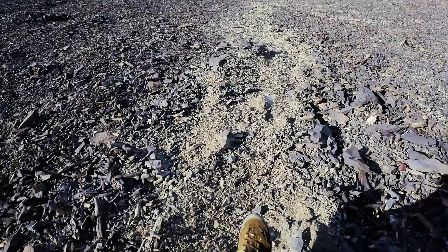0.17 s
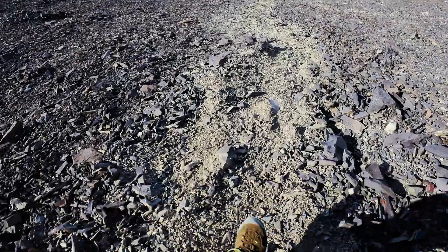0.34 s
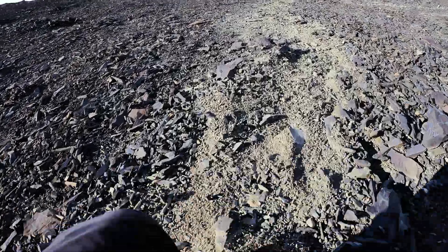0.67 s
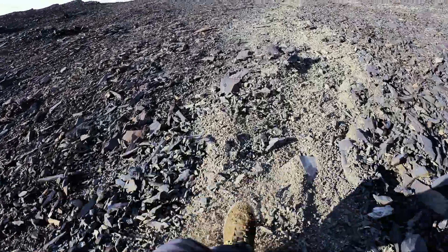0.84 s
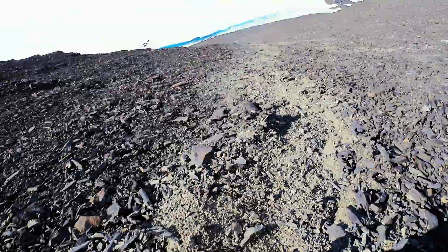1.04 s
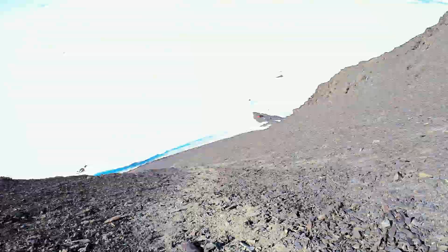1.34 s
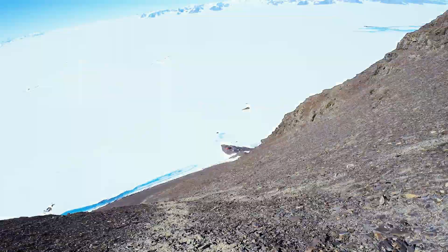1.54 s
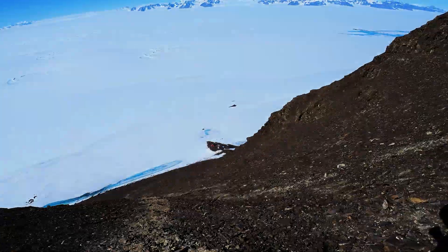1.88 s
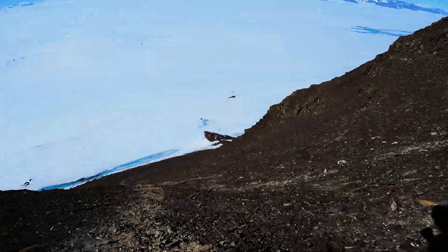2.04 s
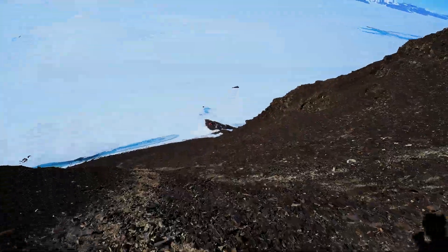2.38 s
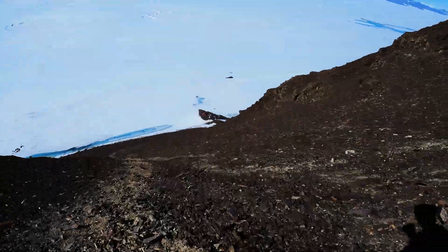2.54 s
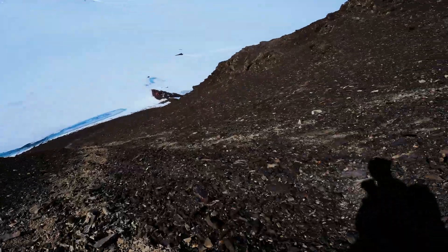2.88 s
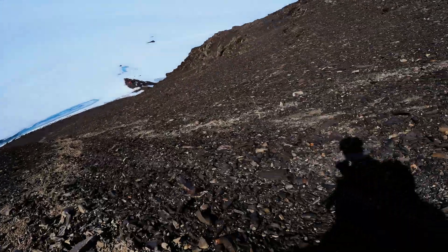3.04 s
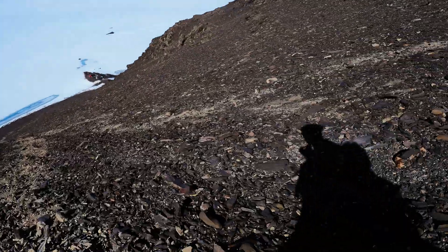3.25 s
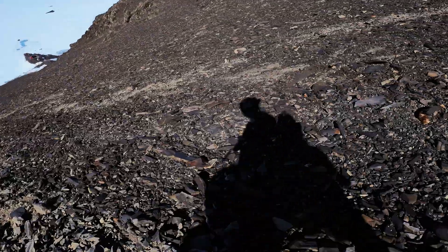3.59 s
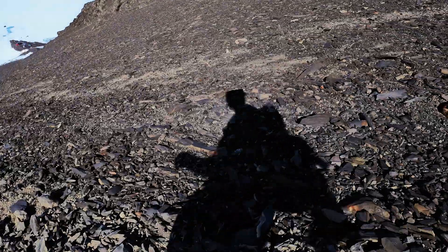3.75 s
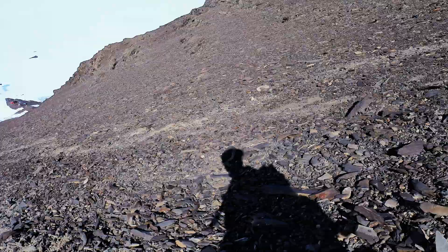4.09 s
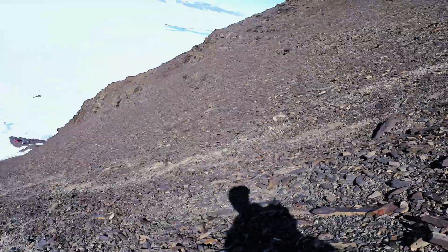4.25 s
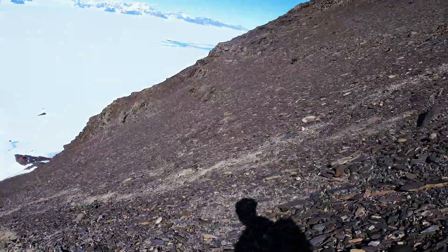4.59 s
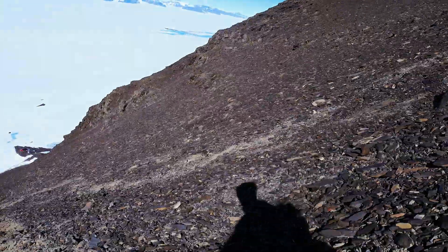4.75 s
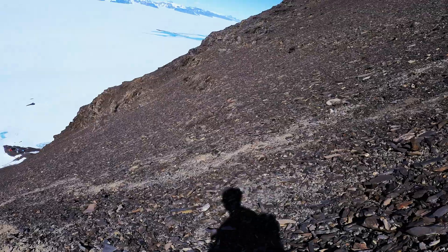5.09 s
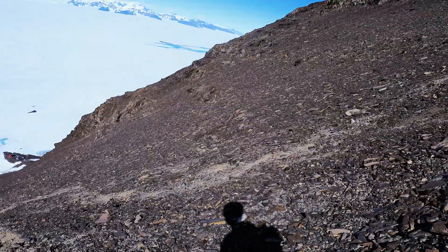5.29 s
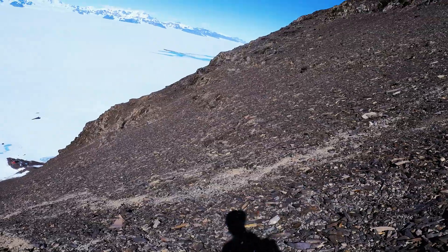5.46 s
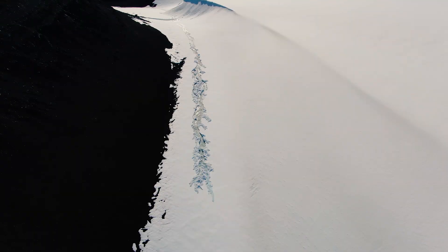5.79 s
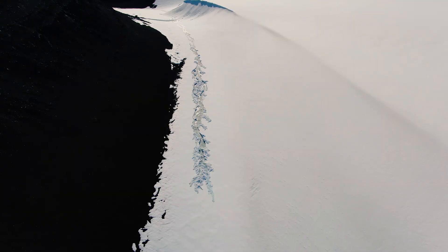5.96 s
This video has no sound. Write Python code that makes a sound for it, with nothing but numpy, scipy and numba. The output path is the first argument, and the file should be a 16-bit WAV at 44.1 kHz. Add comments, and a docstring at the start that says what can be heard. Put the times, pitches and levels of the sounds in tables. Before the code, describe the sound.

Outdoors and close, dry, without echo. From 0 to 1 s the sound is mono: bright gritty scree hisses and crunches under boots, with sharp stone knocks near 0.45, 0.75 and 0.95 s and short low puffs of wind. At about 1 s it opens into wide stereo; the grit is thinner, and wind swells from 1.4 s, leaning left near 1.8 s. Crunches and hard stone clacks bunch between 2.3 and 2.8 s, with a hissing gust at 2.5 s, then more knocks around 3.1 s. From 3 s wind swings right, rumbling and slapping in rapid soft thumps until 5.1 s, while the sliding stones thicken and grow louder. Around 5.2 s it collapses to mono: a loud, dense rush of grit, snapping chips and clinking flakes over continuing low wind, which fades just before an abrupt stop at 5.8 s with a tiny dull tail.

```python
"""A walker slides down loose scree with a small camera: filtered grain showers and noise hiss underfoot,
damped rings knock, snap and clink, and tumbling noise with short pressure pulses buffets the ports.
At first one microphone serves both ears; from about 1 s a pair opens and the wind leans from side to side;
after 5.2 s one microphone serves both again, until the sound stops at 5.8 s with a brief, dull tail."""
import sys
import numpy as np
from scipy import signal
from scipy.fft import rfft, irfft, next_fast_len
from scipy.io import wavfile
from scipy.ndimage import uniform_filter1d
from numba import njit

SR = 44100
rng = np.random.default_rng(int(sys.argv[2]) if len(sys.argv) > 2 else 0)


def log_audio(samples):
    """Write samples as a 16-bit WAV file to the path given in sys.argv[1]."""
    # one column per channel
    frames = np.atleast_2d(samples).T
    # limit to full scale, then quantise
    limited = np.clip(frames, -1, 1)
    pcm = np.round(limited * 32767).astype(np.int16)
    wavfile.write(sys.argv[1], SR, pcm)


N = 270333
TIME = np.arange(N) / SR


# Sliding scree. Each row: time in seconds, then the levels of stones, chips and grit in dB.
SLIDE = [(0.0, -35.5, -39, -27), (0.14, -41.5, -42, -29), (0.37, -39.5, -38.5, -27.5),
         (0.64, -39, -45.5, -32.5), (0.92, -42, -42, -30.5), (1.15, -43, -36.5, -31),
         (1.34, -43.5, -42, -32), (1.51, -44, -46, -34), (2.09, -42.5, -42.5, -29),
         (2.31, -40.5, -39, -28.5), (2.43, -45, -44, -31.5), (2.78, -37, -40.5, -27),
         (3.24, -36.5, -38, -27), (3.45, -36, -41.5, -26.5), (3.81, -33.5, -35.5, -22),
         (3.99, -32.5, -37, -23.5), (4.21, -29.5, -34.5, -24.5), (4.37, -32, -33, -22.5),
         (4.52, -32, -33.5, -24.5), (4.71, -33.5, -36.5, -27), (5.01, -33, -39.5, -27.5),
         (5.17, -32.5, -38, -22.5), (5.21, -27.5, -30.5, -18), (5.38, -30, -28.5, -21.5),
         (5.55, -35, -28, -21), (5.59, -35, -24.5, -25), (5.61, -41, -30, -25.5), (5.65, -36, -28.5, -25.5),
         (5.7, -32.5, -21.5, -21), (5.78, -33.5, -25, -25)]
# Boot crunches (positive) and stalls (negative). Each row: peak in seconds, length in seconds, lift in dB.
CRUNCHES = [(.05, 0.041, 4), (.19, 0.084, 8), (.48, 0.085, 5.5), (1.48, 0.2, 7.5), (1.61, 0.24, -9.5),
            (1.7, 0.048, 8), (1.82, 0.17, 2.5), (1.98, 0.11, -8), (2.3, 0.061, 8.5), (2.42, 0.081, 7),
            (2.5, 0.081, 13), (2.55, 0.032, 3), (2.775, 0.032, 6.5), (2.93, 0.13, -2), (3.07, 0.085, 9),
            (3.17, 0.055, 4), (3.63, 0.092, 3.5), (3.72, 0.078, 2.5), (4.1, 0.19, -4.5), (4.88, 0.064, 3.5)]
CRUNCH_SHARES = 0.98, 0.43, 0.38  # of the lift, for stones, chips and grit
# Grain sizes. Each row: lowest and highest pitch in Hz, grains per second, cycles to fall 30 dB,
# size spread in dB, hiss in dB above the grains, lean to the left in dB, share of the ground's turn,
# likeness of the ports (0-1).
GRAIN_SIZES = [(1242, 4470, 700, 7.9, 2.5, 5.5, -1, 0.54, 0.53),
               (4210, 7660, 1100, 11, 2, 0.5, 1.5, 0.3, 0.51),
               (8070, 15800, 2800, 3.4, 3.5, 2.5, -2, 0.58, 0.14)]
# Colour of each microphone for scree. Each row: frequency in Hz, gain in dB.
FRONT_COLOUR = [(700, 19), (1100, -25.5), (2000, -14.5), (2700, -13), (4000, -9), (5500, -8.5), (7300, -8),
                (9500, -9.5), (12200, 0.5), (14000, -7), (16000, -9)]
LEFT_COLOUR = [(700, -10), (1200, -33), (2000, -8.5), (2600, -5), (3800, -9.5), (5500, -12), (8000, -1.5),
               (9300, 6), (10800, 7), (12500, -0.5), (13300, -2), (16000, -2.5)]
RIGHT_COLOUR = [(700, 12.5), (1200, -2.5), (2000, 9), (2700, 14), (4000, -11), (5500, -48), (7000, -32.5),
                (8500, -20.5), (10500, -10.5), (12000, -1), (13500, -9.5), (16000, -6.5)]
PORT_LAG = 7  # samples by which the right port hears the shared grains late


def scree(pair):
    """Granular flow: three grain sizes share surges, and partly coherent ports each hear some of their own."""
    lift_db = bells_db(CRUNCHES)
    levels = [db + share * lift_db for db, share in zip(curves(SLIDE), CRUNCH_SHARES)]
    turn_db = ground_turn()
    surge_db = 0.5 * walk(30) + 1.6 * walk(80)
    out = 0
    for db, (lo, hi, rate, cycles, spread, hiss_db, lean_db, share, alike) in zip(levels, GRAIN_SIZES):
        both, own_left, own_right = (
            grains(lo, hi, rate, cycles, spread, clink=3.8) + amp(hiss_db) * rng.standard_normal(N)
            for _ in range(3))
        alike = np.clip(alike, 0, 1)
        left = np.sqrt(alike) * both + np.sqrt(1 - alike) * own_left
        right = np.sqrt(alike) * np.roll(both, PORT_LAG) + np.sqrt(1 - alike) * own_right
        ports = (both, FRONT_COLOUR), (left, LEFT_COLOUR), (right, RIGHT_COLOUR)
        heard = [unit(colour(x, table, lo, hi)) for x, table in ports]
        gain = amp(db + surge_db + 0.77 * walk(60))
        out = out + gain * sides(pair * (lean_db + share * turn_db), pair) * route(*heard, pair)
    return sheen(out, pair)


# The top of the grit's hiss brightens and dulls. Each row: time in seconds, lift in dB.
SHEEN = [(1.0, -0.5), (1.2, -0.5), (1.6, 0.5), (2.1, -0.5), (2.35, -1), (2.6, -3), (2.95, -2), (3.2, 3.5),
         (3.45, -4.5), (3.8, -3), (4.05, -4.5), (4.3, -1), (4.6, 1), (4.9, -3), (5.15, -1.5)]
SHEEN_HZ = 11000


def sheen(ground, pair):
    """Spectral tilt in time: the band above the corner rises and falls while the pair is on."""
    top = signal.sosfiltfilt(signal.butter(4, SHEEN_HZ, "high", fs=SR, output="sos"), ground)
    lift_db = curves(SHEEN)[0] + 1.2 * walk(11)
    return ground + (amp(pair * lift_db) - 1) * top


# Knocked stones. Each row: start in seconds, level in dB, ring in Hz, second ring in Hz.
KNOCKS = [(0.0395, -17, 3660, 6240), (0.0556, -26, 2990, 4030), (0.1705, -22, 2650, 4950),
          (0.1748, -31, 2560, 3980), (0.1883, -18, 3570, 2740), (0.2041, -18.5, 2760, 1700),
          (0.2427, -27, 4460, 2950), (0.2954, -25, 3830, 5730), (0.3834, -22, 3220, 6140),
          (0.4516, -13, 3440, 4280), (0.4605, -19, 4070, 2970), (0.5077, -14.5, 4030, 2600),
          (0.5125, -25, 3170, 4650), (0.7317, -24, 1850, 3320), (0.7388, -10.5, 3440, 4340),
          (0.8273, -22, 3290, 4590), (0.9352, -11.5, 3220, 4200), (0.956, -11, 4300, 2080),
          (0.9592, -20, 3940, 2580), (1.6633, -21, 1530, 2640), (1.7097, -16, 1860, 3460),
          (1.8246, -21, 2550, 3340), (1.8652, -20.5, 2270, 3960), (2.0704, -28, 2170, 3010),
          (2.1709, -15, 3850, 2110), (2.2195, -22, 2220, 3270), (2.2282, -16, 2180, 4070),
          (2.2947, -13, 1640, 3290), (2.3241, -4.5, 2900, 1920), (2.494, -18, 2600, 3100),
          (2.4987, -8, 1620, 3040), (2.5087, -15, 2870, 2130), (2.5429, -6, 1590, 3200),
          (2.5538, -13, 1520, 2710), (2.6038, -7.5, 2130, 5940), (2.7042, -21, 1870, 3420),
          (2.7597, -11, 2040, 1350), (2.7703, -5.5, 2080, 3570), (2.776, -9.5, 2000, 1310),
          (2.7814, -20, 1960, 2710), (3.054, -16, 3300, 2200), (3.0598, -11.5, 2200, 3510),
          (3.0692, -12, 2000, 3250), (3.087, -21, 2300, 3300), (3.108, -19.5, 2380, 3960),
          (3.1577, -16, 1960, 2840), (3.1671, -9, 2090, 3050), (3.1725, -11, 2240, 3770),
          (3.399, -17.5, 3370, 2460), (3.499, -23, 4310, 2360), (3.6135, -13, 2130, 3490),
          (3.6205, -14, 3380, 2150), (3.7067, -9.5, 1960, 3340), (3.7111, -13, 3040, 1640),
          (3.7303, -16, 2370, 1760), (3.8838, -18, 2370, 3100), (4.0027, -17.5, 1940, 3280),
          (4.4413, -24, 2000, 4870), (4.5676, -10, 2630, 4370), (4.7315, -13, 3560, 2570),
          (4.7875, -21, 2580, 1790), (4.8198, -19, 2070, 3900), (4.8718, -12.5, 1870, 2390),
          (4.8777, -15, 2580, 1830), (4.9037, -13, 2520, 4480), (4.9174, -12, 4030, 2090),
          (5.3517, -14, 3270, 4610), (5.3585, -16, 5510, 2170), (5.3939, -17, 1870, 2970),
          (5.6326, -10.5, 2720, 3460), (5.6755, -19, 2780, 3700), (5.6835, -12, 3180, 4800),
          (5.6885, -20, 3440, 2330), (5.7349, -11.5, 3230, 6460)]
# Small chips snapped. Each row: start in seconds, level in dB, ring in Hz.
TICKS = [(0.0673, -14, 12400), (0.1037, -18, 11200), (0.5753, -16, 11100), (0.622, -20, 11100),
         (0.8225, -19, 11200), (0.853, -17, 11500), (.9375, -16.5, 11000), (.948, -15, 11400),
         (1.207, -19, 9000), (1.232, -16, 9200), (1.3289, -15, 11100), (1.536, -9.5, 10700),
         (1.6523, -12, 11750), (1.722, -17, 11700), (2.072, -12, 9240), (2.1335, -25, 9410),
         (2.17, -16, 10400), (2.1994, -12, 11740), (2.289, -19, 9800), (2.4154, -14, 11000),
         (2.6299, -14, 10700), (2.9941, -21, 10500), (3.2365, -12, 11800), (3.341, -13, 11800),
         (3.3692, -19, 9400), (4.6738, -11, 10900), (4.7593, -11.5, 11500), (4.9016, -18, 11600),
         (5.2616, -11.5, 10070), (5.2824, -9, 9800), (5.359, -26.5, 8930), (5.501, -22, 10060),
         (5.554, -13.5, 10460), (5.5777, -8, 9200), (5.578, -9.5, 11200), (5.659, -16, 11200),
         (5.717, -18, 10500), (5.6425, -12, 11100), (5.7716, -11, 10170)]
# Thin flakes that clink. Each row: start in seconds, level in dB, ring in Hz.
CLINKS = [(.1685, -22, 2620), (.1875, -27, 3620), (.0209, -28, 4530), (.2254, -28, 3850),
          (.2853, -29, 5660), (.307, -27, 4010), (.5746, -28, 5630), (.6558, -27.5, 5600),
          (1.824, -24.5, 2570), (2.0737, -28, 3870), (2.5054, -19, 2950), (2.5431, -25, 3220),
          (3.853, -20, 2620), (4.2956, -25, 2820), (4.7859, -23, 2570), (2.623, -29, 3380),
          (4.8186, -34, 4040), (4.889, -30, 1760), (4.902, -26, 4440), (5.766, -23, 5200),
          (5.473, -17, 6570), (5.5392, -19, 5650), (5.5901, -24.5, 5630), (5.6321, -16, 5800),
          (5.7048, -29, 5690), (5.7493, -18, 5700)]
# Kinds of strike. Each row: its table, ring in dB above the row's level, cycles to fall 60 dB,
# crack of the neighbours in dB relative to the row's level.
KINDS = [(KNOCKS, 0.68, 12.7, -11), (TICKS, 2.3, 148, -14.5), (CLINKS, 1.2, 180, -21)]
SECOND_DB = -7  # second ring of a knock when an octave away; a nearer one is louder
CONTACT_CYCLES = 0.25  # time constant of the contact
KNOCK_LEFT_DB, KNOCK_TURNS = -0.5, -0.3  # strikes lean left as the wind moves right
PORT_PHASE = 1.4  # radians by which the right port trails the left


def strikes(pair, count=14):
    """Modal impact: each strike excites a damped ring, knocks a second, and neighbours crack around it."""
    rows = [(*row[:3], *kind) for table, *kind in KINDS for row in table]
    s, db, hz, ring_db, cycles, crack_db = np.transpose(rows)
    ring = rings(samples(s), hz, cycles / hz, amp(db + ring_db), 0 * s, CONTACT_CYCLES)

    knock_s, knock_db, first_hz, second_hz = np.transpose(KNOCKS)
    second_db = knock_db + SECOND_DB * np.log2(second_hz / first_hz) ** 2
    second = rings(samples(knock_s), second_hz, 14 / second_hz, amp(second_db), 0 * knock_s, CONTACT_CYCLES)

    # most neighbours crack at once; a few trickle up to 12 ms late, and weaker
    late, pitch, turn = rng.random((len(s), 3, count)).transpose(1, 2, 0)
    rung = (np.arange(count)[:, None] + pitch) / count
    near_s = s + 0.012 * late ** 9
    near_hz = np.minimum(hz * 0.79 * 1.5 ** rung, 15000.)
    crack = amp(db + crack_db - 5.4 * late ** 3)
    near = rings(samples(near_s).ravel(), near_hz.ravel(), (12 / near_hz).ravel(), crack.ravel(),
                 0.61 * turn.ravel(), 1.0)

    high_pass = signal.butter(4, 1000, "high", fs=SR, output="sos")
    hits = signal.sosfilt(high_pass, ring + second + near)
    lean = amp((KNOCK_LEFT_DB + KNOCK_TURNS * curves(TURN)[0]) / 2)
    trailing = (signal.hilbert(hits, next_fast_len(N))[:N] * np.exp(-1j * PORT_PHASE)).real
    return route(hits, lean * hits, trailing / lean, pair)


# Turn of the camera in the wind. Each row: time in seconds, wind left minus right in dB.
TURN = [(1.0, -0.5), (1.15, -7), (1.4, 2.5), (1.8, 10), (2.2, 0.5), (3.0, -0.5), (3.1, -16.5),
        (3.33, -30.5), (3.7, -7.5), (3.9, -20.5), (4.24, -22), (4.31, -10.5), (4.75, -22.5), (5.0, -24),
        (5.2, 1)]
GROUND_LEFT_DB, GROUND_TURNS = 8, -0.24  # the ground leans left, more as the wind moves right


def ground_turn():
    """Interaural level difference of the ground, left minus right in dB, opposing the wind's."""
    return GROUND_LEFT_DB + GROUND_TURNS * curves(TURN)[0] + 1.0 * walk(11.0)


# Wind. Each row: time in seconds, rumble in dB, eddies and their rushing edge in dB above the rumble.
WIND = [(0.0, -42.5, -9, -8), (0.05, -30, -19, -18.5), (0.11, -54, -12, -19), (0.16, -28.5, -9.5, -14),
        (0.29, -52.5, -13, -23), (0.35, -27.5, -37, -41), (0.39, -43, -14, -22), (0.45, -34, -6.5, -8),
        (0.77, -42, -38, -10), (0.85, -60, -7, 3), (1.11, -52.5, -14, -29), (1.16, -36.5, -8, -20.5),
        (1.27, -51, 1, -1.5), (1.4, -24.5, -7, -13), (1.91, -23, 0, -18.5), (2.14, -27, -8, -16.5),
        (3.43, -26, 0, -14), (3.69, -25.5, -5.5, -12.5), (4.17, -25, -1.5, -11.5), (4.33, -23, -3, -11),
        (4.46, -30.5, -3, -4.5), (4.51, -23.5, -3, -18.5), (4.96, -25, -0.5, -10),
        (5.46, -23.5, -7.5, -17.5), (5.62, -36, -14.5, -32), (5.78, -39.5, -37.5, -35)]
# Gusts sharpen the eddies and lulls dull them. Each row: peak in seconds, length in seconds, lift in dB.
GUSTS = [(1.54, 0.14, 4), (2.1, 0.066, 0), (2.504, 0.15, 3), (2.712, 0.0077, 12), (2.938, 0.26, 5.5),
         (3.25, 0.034, -5.5), (3.33, 0.032, 7.5), (3.81, 0.047, -5.5), (3.977, 0.06, 4.5), (4.1, 0.07, 2.5),
         (4.23, 0.042, 2), (4.3, 0.07, -8.5), (4.442, 0.032, 5.5), (4.86, 0.15, 2.5), (5.038, 0.034, 4.5)]
EDGE_LIFT = 1.5  # in a gust the edge rises more than the eddies
# The rumble heaves or drops out. Each row: peak in seconds, length in seconds, lift in dB.
HEAVES = [(2.55, 0.12, 4), (2.93, 0.066, 6), (3.57, 0.075, -2), (3.65, 0.033, 3.5), (3.81, 0.032, -4.5),
          (4.03, 0.03, -2), (4.09, .04, -1), (4.25, 0.044, 0), (4.29, 0.11, -5.5), (4.36, 0.076, 5),
          (4.78, 0.093, 1.5), (4.85, 0.082, -6), (5.29, 0.053, -10), (5.36, .04, 3)]
# Spectrum of the rumble. Each row: frequency in Hz, gain in dB.
RUMBLE_COLOUR = [(30, -61.5), (55, -27), (80, -8), (105, 2), (150, 2), (190, -1), (240, -13), (400, -24),
                 (1000, -43)]
# Spectrum of the eddies. Each row: frequency in Hz, gain in dB.
EDDY_COLOUR = [(60, -52.5), (120, -19.5), (220, -2.5), (320, -5.5), (500, -12.5), (800, -10), (1300, -17),
               (2500, -44), (5000, -60)]
EDGE_HZ = 537  # eddies below, their edge above


def wind(pair):
    """Turbulence: air tumbles over each port on its own, with sharp eddies mostly on the windward side."""
    db, eddy_db, edge_db = curves(WIND)
    pan_db = curves(TURN)[0] + 0.26 * walk(11)
    gust_db = bells_db(GUSTS)
    rumble, eddies, edges = [], [], []
    for _ in range(2):
        throb_db = 0.83 * walk(35)
        rumble.append(unit(amp(throb_db) * colour(rng.standard_normal(N), RUMBLE_COLOUR)))
        tumble = grains(177, 1090, 60, 1.5, 1.6) + amp(13.5) * rng.standard_normal(N)
        tumble = amp(0.7 * throb_db) * tumble
        eddies.append(unit(colour(tumble, EDDY_COLOUR, hi_hz=EDGE_HZ)))
        strength = uniform_filter1d(np.abs(eddies[-1]), size=220)  # the edge follows its eddies
        edges.append(unit(colour(strength * tumble, EDDY_COLOUR, lo_hz=EDGE_HZ)))
    low = amp(bells_db(HEAVES)) * sides(0.59 * pan_db, pair) * route(rumble[0], *rumble, pair)
    mid = amp(eddy_db + gust_db) * sides(0.72 * pan_db, pair) * route(eddies[0], *eddies, pair)
    high = amp(edge_db + EDGE_LIFT * gust_db) * sides(0.3 * pan_db - 2.0 * pair, pair)
    high = high * route(edges[0], *edges, pair)
    return amp(db) * (low + mid + high) + rush(pair)


# The hardest slaps of wind. Each row: start in seconds, level in dB, centre in Hz.
SLAPS = [(1.5719, -11.5, 430), (1.794, -15.5, 450), (1.981, -8.5, 322), (2.4974, -2, 930),
         (2.7018, -28, 375), (2.8135, -7, 444), (2.8605, -6, 310), (3.1733, -12, 334), (3.187, -9, 340),
         (3.3002, -4.5, 467), (3.3137, -11.5, 300), (3.331, -11, 320), (3.3427, -8, 366), (3.361, -11, 413),
         (3.3708, -7, 312), (3.4307, -7, 304), (3.486, -9, 560), (3.543, -16, 400), (3.6031, -9.5, 520),
         (3.921, -7.5, 370), (3.9408, -5.5, 306), (3.9731, -10, 386), (3.9946, -5, 320), (4.0715, -6, 320),
         (4.0922, -5, 610), (4.136, -10, 320), (4.16, -4, 452), (4.216, -5, 307), (4.2455, -2.5, 340),
         (4.3765, -6, 300), (4.3838, -9, 260), (4.4298, -11, 362), (4.442, -13, 330), (4.4562, -1, 383),
         (4.6668, -9, 320), (4.7524, -9, 310), (4.8612, -4.5, 290), (4.9406, -5.5, 580), (4.9533, -6, 318),
         (4.9793, -11, 360), (5.0097, -7, 370), (5.033, -10, 380), (5.0424, -2.5, 284),
         (5.1168, -11.5, 387)]


def slaps():
    """Pressure pulses: a few fast-damped cycles and a sharper edge 2.4 times higher, on the windward port."""
    s, db, hz = np.transpose(SLAPS)
    body = rings(samples(s), hz, 6.3 / hz, amp(db + 7.5), 0 * s, 0.77)
    edge = rings(samples(s), 2.4 * hz, 3.5 / hz, amp(db - 6.0), 0 * s, 0.73)
    left = curves(TURN)[0] > 0
    return (body + edge) * np.array([left, ~left])


# A gust hisses across the ports. Each row: time in seconds, level in dB.
RUSH = [(1.25, -66), (1.33, -43), (1.45, -36.5), (1.52, -32.5), (1.6, -59), (2.2, -48.5), (2.55, -34.5),
        (3.0, -62.5), (4.0, -60.5), (5.3, -50)]
RUSH_HZ = 1040, 3010  # band


def rush(pair):
    """Incoherent flow noise: the gritty hiss of the strongest gusts, unrelated at the two ports."""
    hiss = []
    for _ in range(2):
        gritty = amp(5.1 * walk(70)) * rng.standard_normal(N)
        hiss.append(unit(colour(gritty, [(1000, 4.0), (3000, -11)], *RUSH_HZ)))
    return amp(curves(RUSH)[0]) * sides(-6 * pair, pair) * pair * np.array(hiss)


def grains(lo_hz, hi_hz, rate, cycles, spread_db, clink=.0):
    """Random impulse shower: many small short rings, few large; a few thin flakes ring longer."""
    when, pitch, luck, turn, thin = rng.random((int(rate * N / SR), 5)).T
    hz = lo_hz * (min(hi_hz, .45 * SR) / lo_hz) ** pitch
    t60 = 2 * cycles / hz * (1 + clink * thin ** 8)
    size = amp(-spread_db * np.log(1.002 - luck))
    return unit(rings((when * N).astype(np.int64), hz, t60, size, turn, 0.018))


@njit
def rings(start, hz, t60, size, turn, push):
    """Damped oscillation: each grain's ring swells with a time constant of push cycles, then dies away."""
    out = np.zeros(N)
    for k in range(len(start)):
        step = np.exp(2j * np.pi * hz[k] / SR - np.log(1000) / (t60[k] * SR))
        z = size[k] * np.exp(2j * np.pi * turn[k])
        swell, rise = 0., min(1., hz[k] / SR / push)
        for i in range(start[k], min(N, start[k] + int(t60[k] * SR))):
            swell += (1 - swell) * rise
            out[i] += swell * z.imag
            z *= step
    return out


def samples(s):
    """Sampling: times in seconds as sample numbers."""
    return (s * SR).astype(np.int64)


def amp(db):
    """Decibel law: the gain of a level in dB."""
    return 10 ** (np.asarray(db) / 20)


def unit(x):
    """Normalisation to rms 1."""
    return x / np.sqrt(np.mean(x ** 2))


def curves(table):
    """Linear interpolation of every column of a table, sample by sample."""
    s, *columns = np.transpose(table)
    return [np.interp(TIME, s, column) for column in columns]


def bells_db(table):
    """Gaussian envelopes: each row swells and fades as a bell, its length taken between the 1/e points."""
    return sum(db * np.exp(-(2 * (TIME - s) / length) ** 2) for s, length, db in table)


def walk(rate):
    """Low-passed noise: random levels held 1 / rate s and smoothed twice; rms 1."""
    k = int(SR / rate)
    held = np.repeat(rng.standard_normal(N // k + 1), k)
    return unit(uniform_filter1d(uniform_filter1d(held, k), k)[:N])


def colour(x, table, lo_hz=0.7, hi_hz=1e5):
    """Spectral shaping by (Hz, dB) points, inside a band with soft edges."""
    size = next_fast_len(N)
    f = np.arange(1, size // 2 + 2) * SR / size
    hz, db = np.transpose(table)
    gain = amp(np.interp(np.log(f), np.log(hz), db))
    band = 1 / np.sqrt((1 + (lo_hz / f) ** 16) * (1 + (f / hi_hz) ** 16))
    return irfft(rfft(x, size) * gain * band, size)[:N]


def sides(pan_db, pair):
    """Power summation: with the pair on, two unrelated ports of level 1 keep a mean of level 1."""
    gain = amp(np.array([pan_db, -pan_db]) / 2)
    return gain * (1 - pair + pair * 2 / np.sqrt(np.sum(gain ** 2, axis=0)))


PAIR_S, SWITCH_S = (0.97, 5.185), 0.012  # the pair is on between these times; length of each crossfade


def route(front, left, right, pair):
    """Crossfade of one microphone in both ears and the pair; the front one serves first, the left one last."""
    single = np.where(TIME < np.mean(PAIR_S), front, left)
    return (1 - pair) * single + pair * np.array([left, right])


def scene():
    """Superposition of ground, strikes and wind, with the pair crossfaded in and out."""
    inside_s = np.minimum(TIME - PAIR_S[0], PAIR_S[1] - TIME)
    pair = np.clip(inside_s / SWITCH_S + .5, 0, 1)
    return scree(pair) + strikes(pair) + wind(pair) + slaps()


END_S, TAIL_DB, TAIL_DB_PER_S = 5.806, -0.5, -1700
TOP_HZ = 15800


def record(dry):
    """Soft saturation rounds the peaks; the sound stops with a brief dull tail; a steep low-pass cuts the top."""
    rounded = .7 * np.tanh(dry / .7)
    dull = signal.sosfilt(signal.butter(2, 400, fs=SR, output="sos"), rounded)
    tail = dull * amp(TAIL_DB + TAIL_DB_PER_S * np.maximum(TIME - END_S, 0))
    ended = np.where(TIME < END_S, rounded, tail)
    return signal.sosfilt(signal.ellip(12, .2, 100, TOP_HZ, fs=SR, output="sos"), ended)


dry = scene()
out = record(dry)
log_audio(out)
```